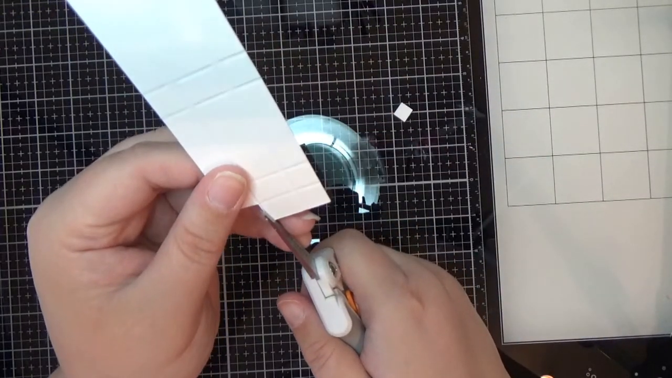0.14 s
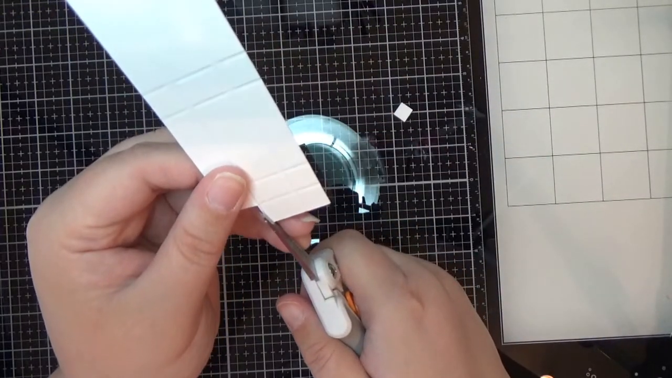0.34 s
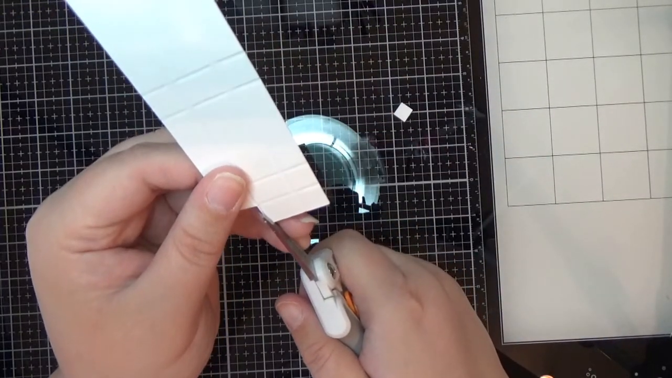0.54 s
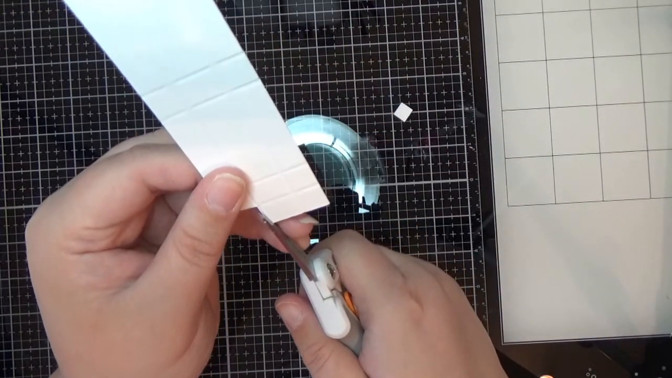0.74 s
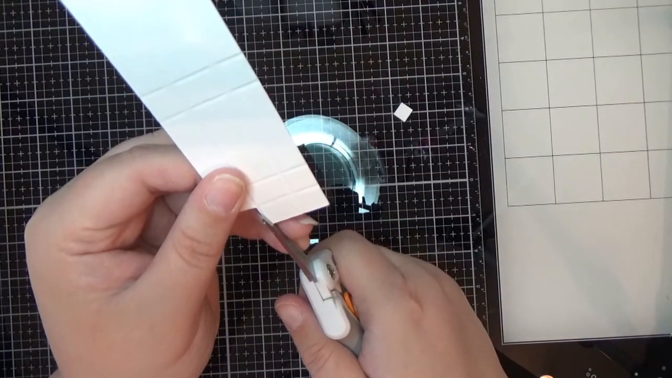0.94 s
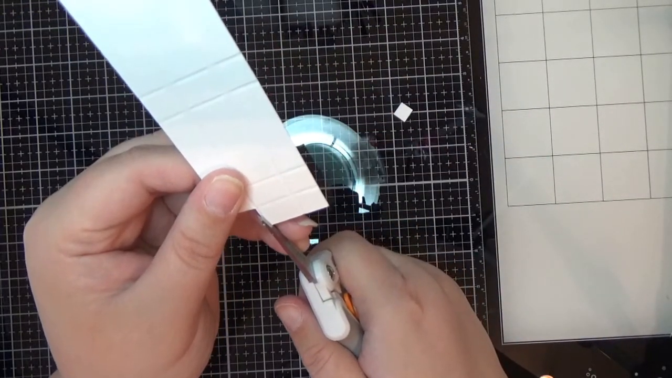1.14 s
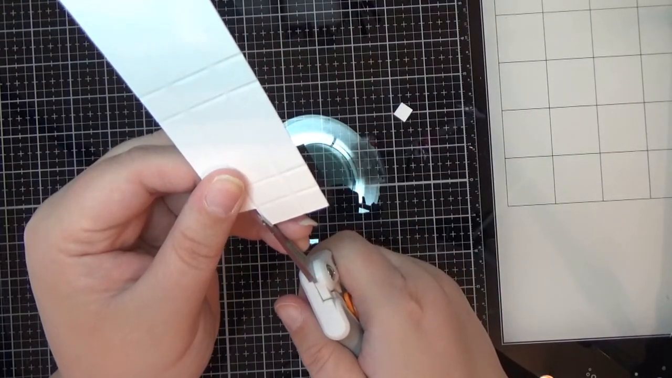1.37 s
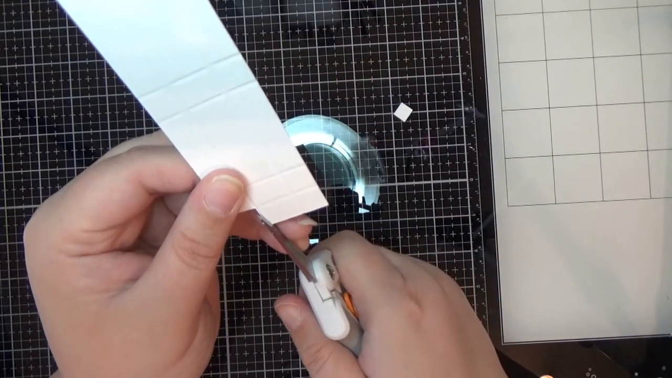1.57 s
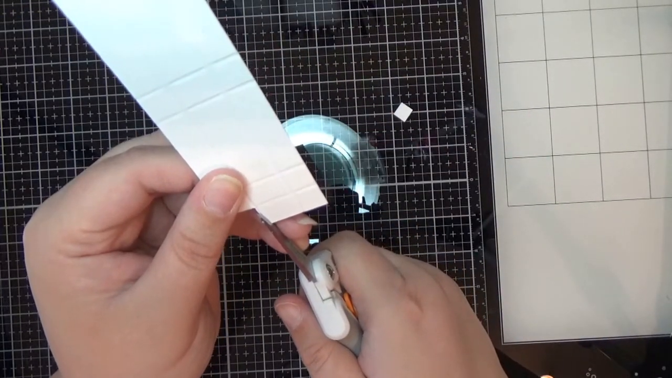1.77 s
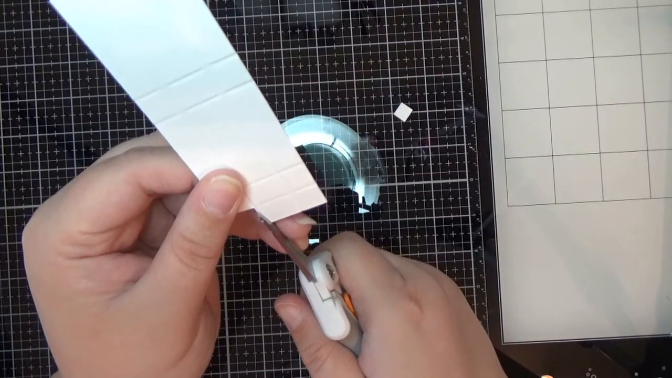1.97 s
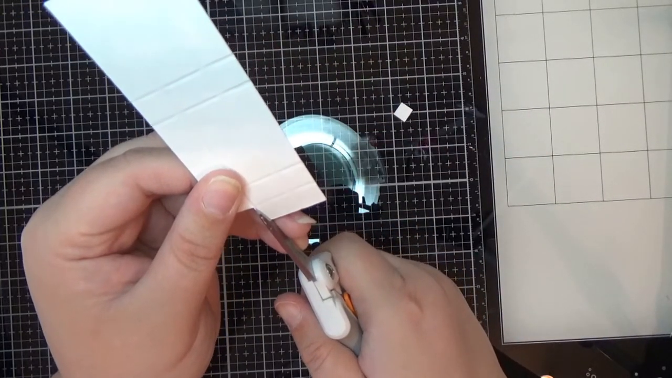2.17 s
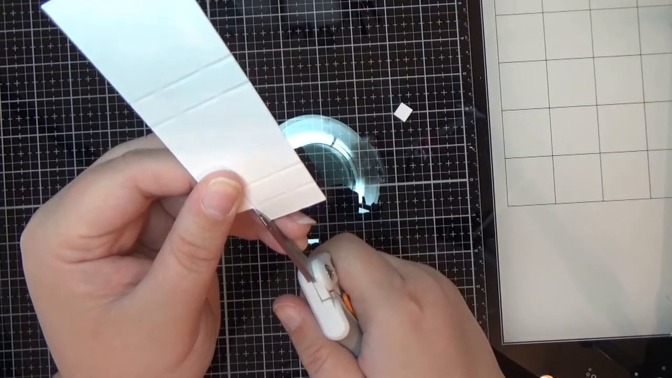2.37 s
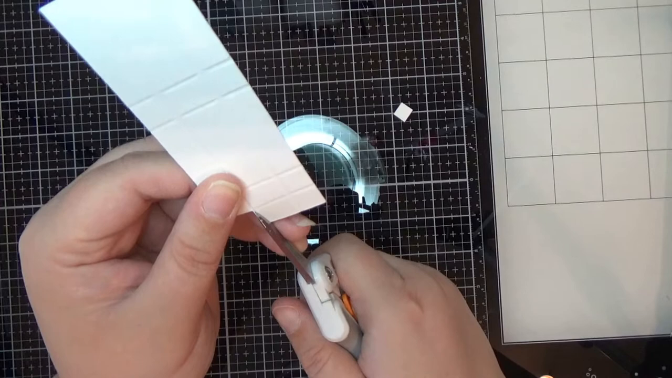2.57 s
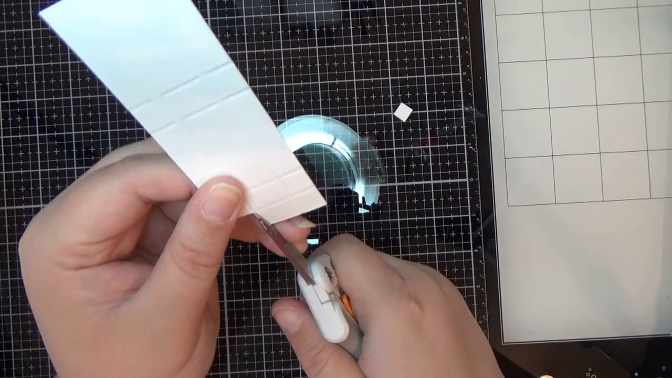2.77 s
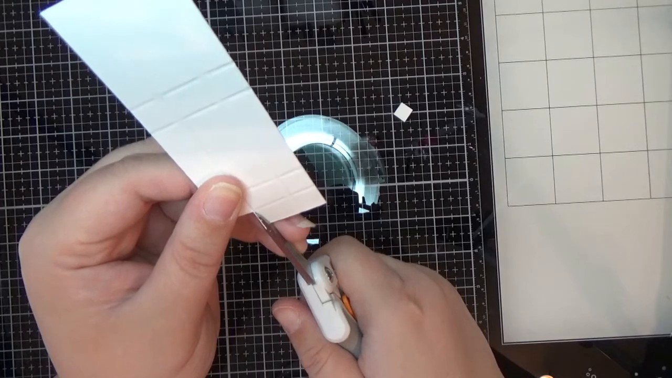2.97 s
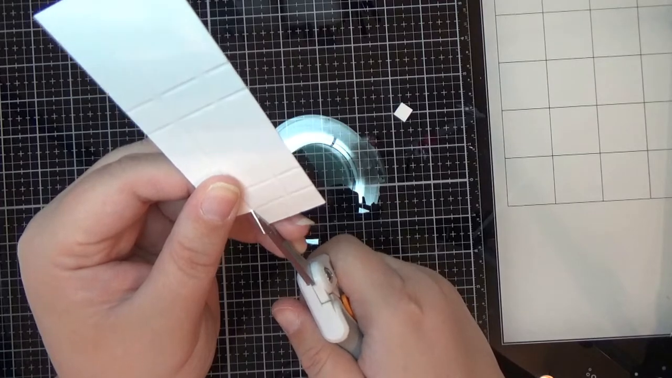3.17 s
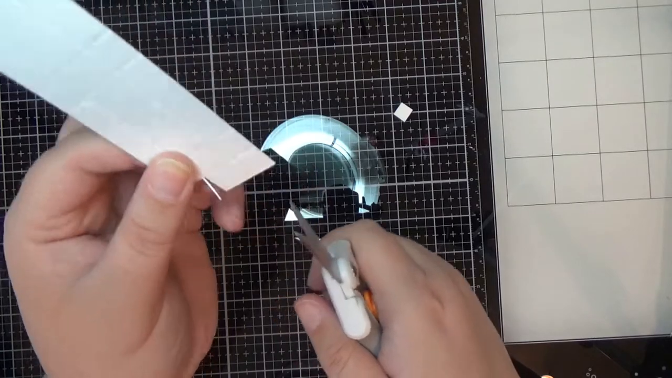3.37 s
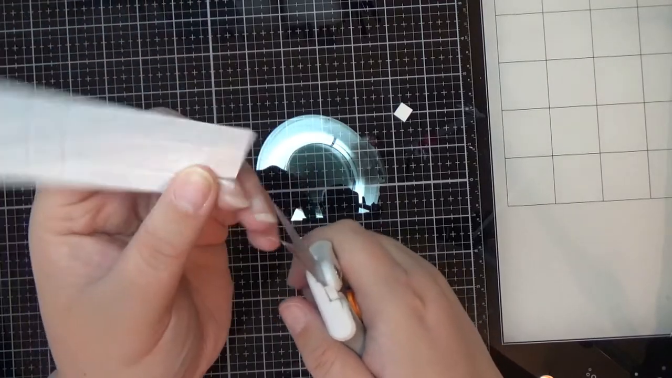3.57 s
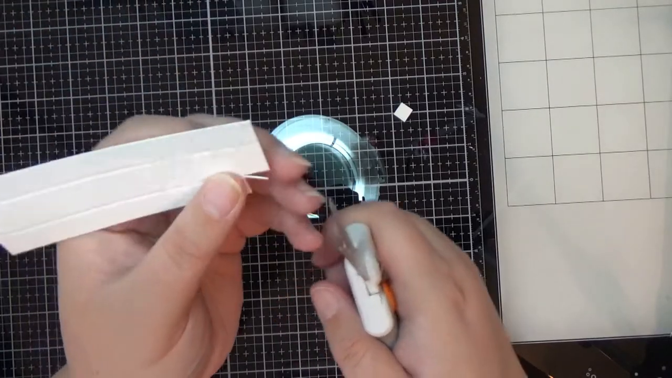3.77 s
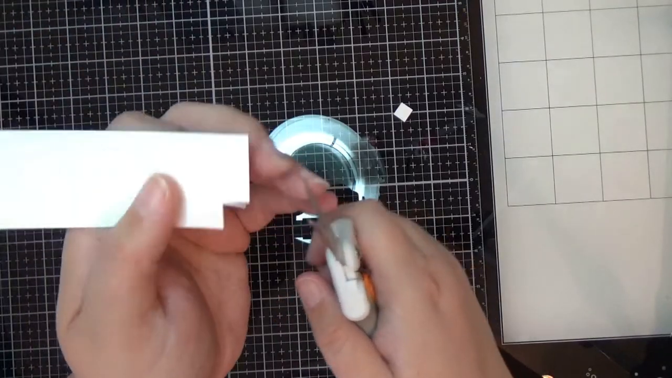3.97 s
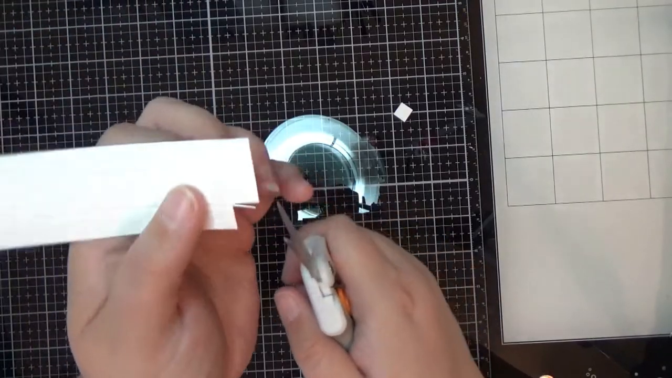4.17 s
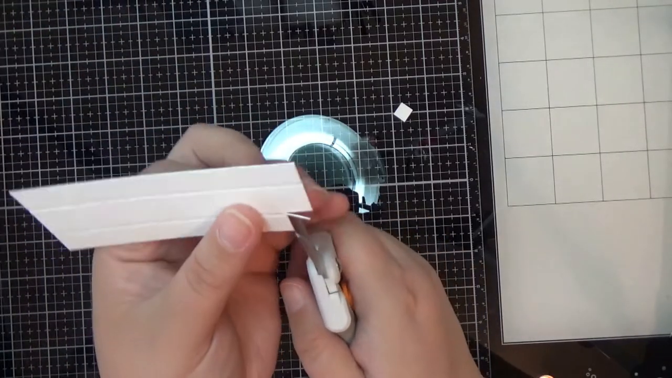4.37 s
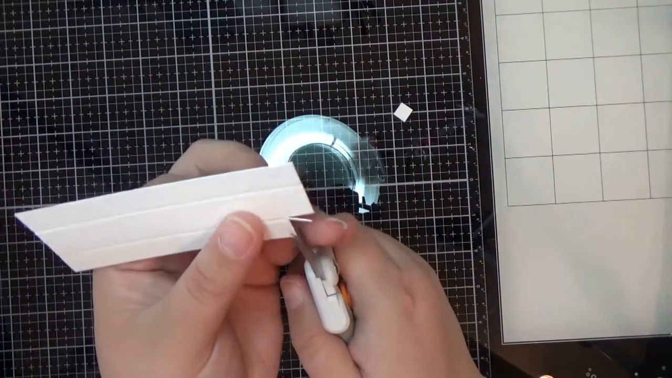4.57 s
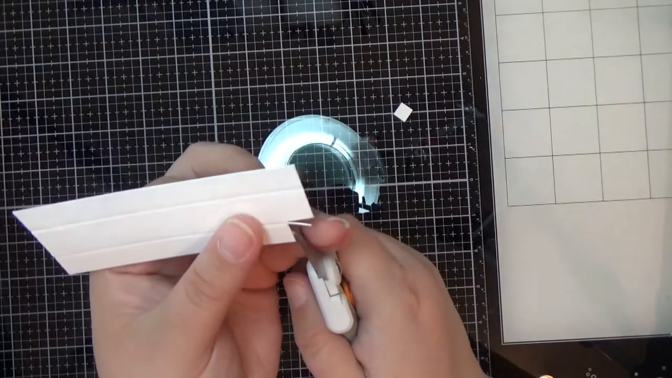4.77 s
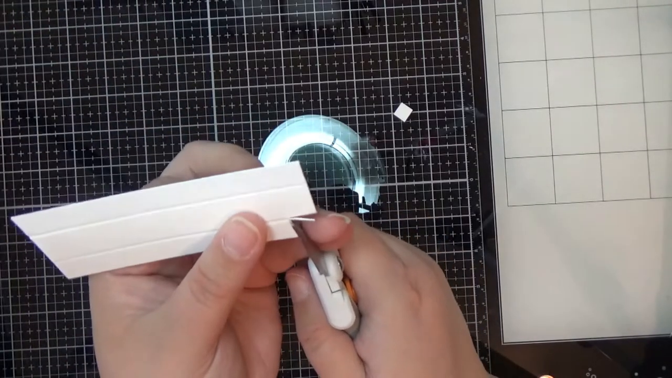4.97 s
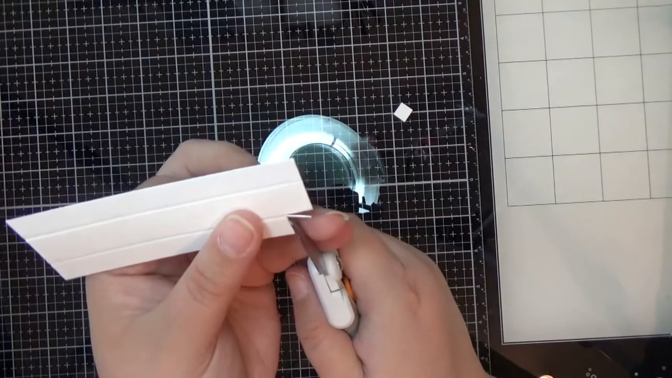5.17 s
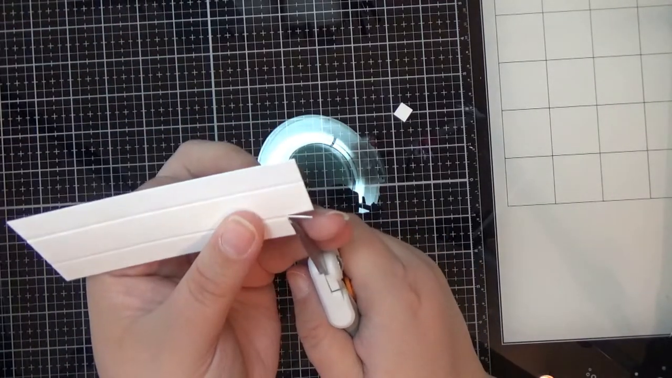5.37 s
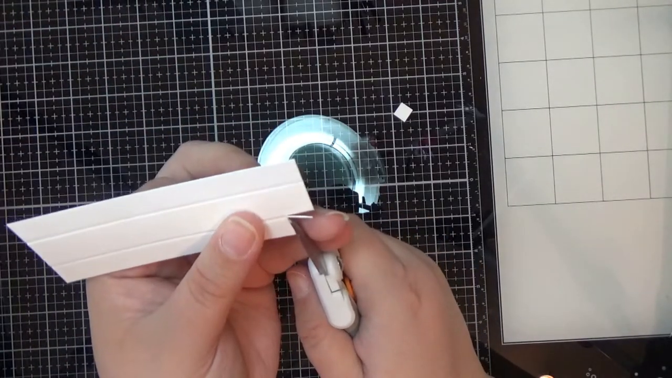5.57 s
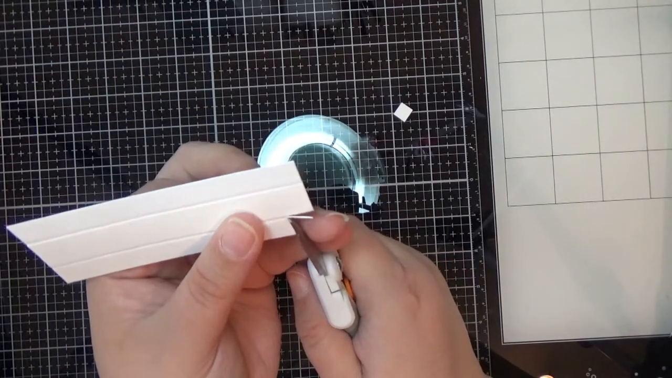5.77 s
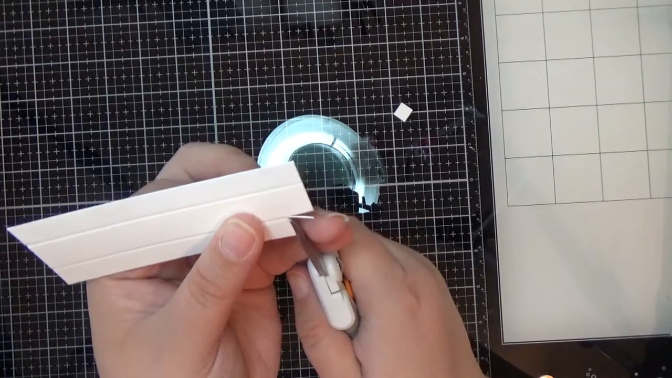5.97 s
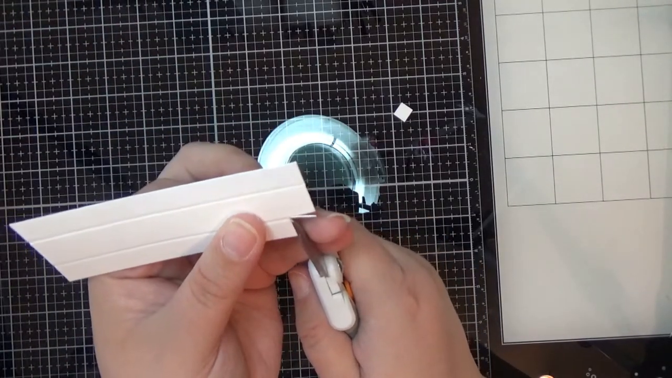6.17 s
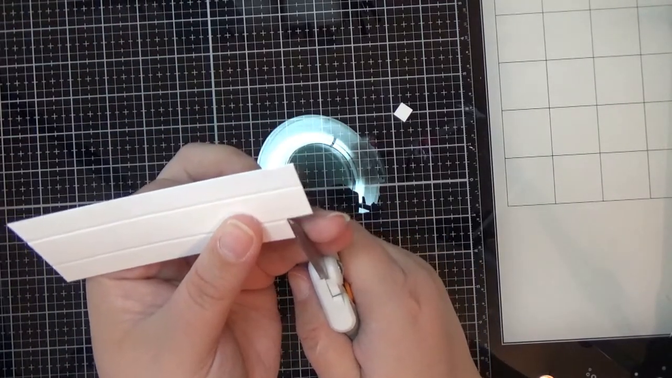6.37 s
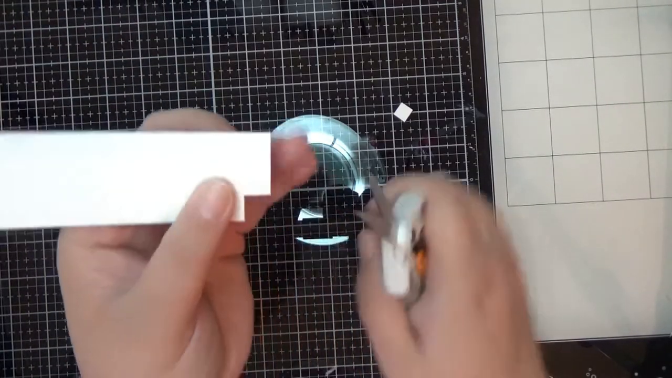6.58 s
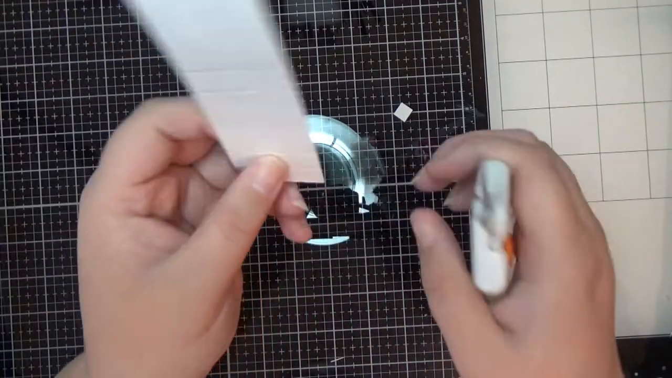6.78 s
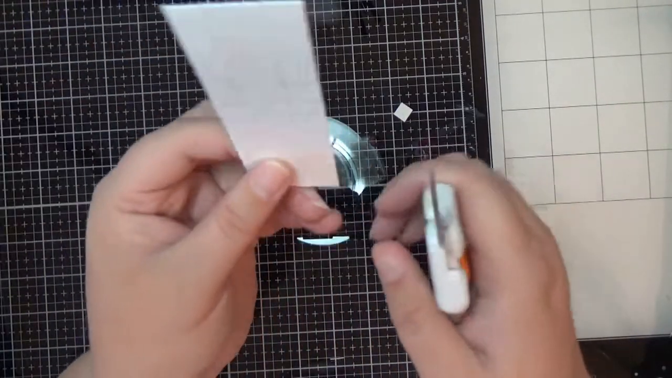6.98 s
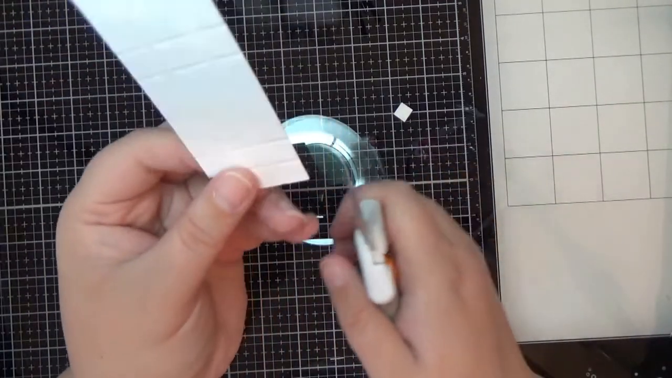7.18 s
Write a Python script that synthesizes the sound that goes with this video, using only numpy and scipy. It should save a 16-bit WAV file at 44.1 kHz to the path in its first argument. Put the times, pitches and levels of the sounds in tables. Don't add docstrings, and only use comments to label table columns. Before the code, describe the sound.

In a quiet small room, close microphones hear tiny dry clicks as blades settle on stiff card, then a sharp crunching snip. Fingers rub and turn the card with papery swishes and knocks. After a pause a second, louder snip cracks, and the card is lifted with soft rustling. A camera focus motor ticks faintly over steady hiss.

```python
import sys
import numpy as np
from scipy import signal
from scipy.fft import rfft, irfft, next_fast_len
from scipy.io import wavfile
from scipy.ndimage import uniform_filter1d

SR = 44100
rng = np.random.default_rng(int(sys.argv[2]) if len(sys.argv) > 2 else 0)


def generate_wav(signal):
    frames = np.transpose(np.atleast_2d(signal))
    scaled = np.clip(frames, -1, 1) * 32767
    pcm = np.round(scaled).astype(np.int16)
    wavfile.write(sys.argv[1], SR, pcm)


def boost_factor(decibels):
    exponent = np.asarray(decibels, float) / 20
    return 10 ** exponent


N = 318293
HZ = np.fft.rfftfreq(next_fast_len(N, real=True), 1 / SR)
PAD = 2 * (len(HZ) - 1)
TIME = np.arange(N) / SR
BODY_HZ, HISS_HZ = 1300, 4500
TOP_HZ = 11050


def shape(table):
    hz, db = np.transpose(table)
    return boost_factor(np.interp(np.log(HZ + 1), np.log(hz), db))


def colour(x, gain):
    y = irfft(rfft(x, PAD) * gain, PAD)[:N]
    return y / np.sqrt(np.mean(y ** 2))


def split(x, edges_hz):
    below = [1 / (1 + (HZ / hz) ** 8) for hz in edges_hz]
    uppers, lowers = [1] + below, below + [0]
    return np.array([colour(x, upper - lower) for upper, lower in zip(uppers, lowers)])


def walk(rate):
    hold = int(SR / rate)
    levels = np.repeat(rng.standard_normal(N // hold + 1), hold)
    return 0.53 * uniform_filter1d(uniform_filter1d(levels, hold), hold)[:N]


def fibres(spread_db):
    return rng.standard_normal(N) * boost_factor(spread_db * rng.exponential(size=N))


def bursts(events, bands, low_stretch):
    out = np.zeros(N)
    for (s, db, body_db, low_db, rise_ms, fall_ms), trio in zip(events, bands):
        i = int(s * SR)
        ms = 1000 * TIME[:min(N - i, SR // 4)]
        for band, rel_db, stretch in zip(trio, (0, body_db, low_db), (1, 1.25, low_stretch)):
            rise = max(rise_ms, 0.1) * stretch
            fall = max(fall_ms, 0.2) * stretch
            course = np.minimum(ms / rise, 1) ** 1.08 * np.exp(-np.maximum(ms - rise, 0) / fall)
            out[i:i + len(ms)] += boost_factor(db + rel_db - 5.5) * course * band[i:i + len(ms)]
    return out


def air():
    # frequency in Hz, hiss level in dB per Hz.
    floor = [(15, -60), (25, -29.5), (314, -4.5), (737, -6), (1010, -1.5), (1170, -4.5), (1600, -1.5),
             (1920, -8.5), (2070, -9.5), (2970, -9), (3470, -8.5), (4380, -15.5), (4860, -10),
             (10500, -15.5), (12000, -24), (15600, -71), (22000, -120)]
    # hum frequency in Hz, width in Hz, lift in dB.
    hums = [(1590, 20, 6.5), (2540, 91, 4.5), (820, 34, 5), (2063, 54, 9), (4720, 700, 4.5)]
    # frequency in Hz, side minus mid in dB.
    spread = [(60, -13), (110, -8), (190, -8), (350, -6), (620, 0), (1120, -4), (2000, -3), (3590, -2),
              (6450, -9), (11600, -7.5)]
    lift_db = sum(db / (1 + (2 * (HZ - hz) / width) ** 2) for hz, width, db in hums)
    mid, side = rfft(rng.standard_normal((2, PAD))) * shape(floor) * boost_factor(lift_db)
    side = side * shape(spread)
    level_db = -65 + 0.6 * walk(1.5)
    scale = boost_factor(level_db) / np.std(irfft(mid, PAD))
    return irfft(np.array([mid + side, mid - side]), PAD)[:, :N] * scale


def focus_motor():
    # start in seconds, end in seconds, strong step in dB, weak step in dB.
    spells = [
        (0, .03, -58, -58),
        (.07, 1.87, -53, -59),
        (1.91, 1.99, -60, -56),
        (3.78, 5.83, -51, -60),
        (5.9, 7.2, -52, -59),
    ]
    # ring in Hz, level in dB, t60 in seconds.
    barrel = [(3487, 6.5, .012), (4073, -10.5, 0.054), (2766, -10.5, 0.041), (2570, -7, 0.019)]
    steps, running = np.zeros(N), np.zeros(N)
    clock = np.arange(0.0093, N / SR, 0.04)
    chance = rng.standard_normal(len(clock))
    for first, last, strong_db, weak_db in spells:
        db = np.where(np.arange(len(clock)) % 2, strong_db, weak_db) + 0.54 * chance
        on = (clock > first) & (clock < last)
        steps[(clock[on] * SR).astype(int)] = boost_factor(db[on])
        running[int(first * SR):int(last * SR) + 2000] = 1
    t = TIME[:2000]
    ring = sum(boost_factor(db - 60 * t / t60) * np.sin(2 * np.pi * hz * t) for hz, db, t60 in barrel)
    ticks = signal.fftconvolve(steps, ring * np.minimum(t / 0.00085, 1))[:N]
    whir_shape = shape([(900, -24), (2300, -2.5), (5000, -11.5), (10000, -9.0), (12000, -23)])
    whir = colour(rng.standard_normal(N), whir_shape)
    return ticks + boost_factor(-79.5) * uniform_filter1d(running, size=2000) * whir


def room(x):
    # band centre in Hz, t60 in seconds, level in dB.
    bands = [(315, 0.21, -6.5), (1190, 0.2, -19.5), (2450, 0.3, -23.5), (4420, 0.29, -26.5),
             (6470, 0.27, -24), (9800, 0.15, -26)]
    t = TIME[:SR // 2]
    tail = 0
    for hz, t60, db in bands:
        edges_hz = [hz / 1.166, min(hz * 1.295, TOP_HZ)]
        sos = signal.butter(2, edges_hz, "bandpass", fs=SR, output="sos")
        mid, side = signal.sosfilt(sos, rng.standard_normal((2, len(t))))
        stereo = mid + 0.7 * side * np.array([[1], [-1]])
        tail = tail + boost_factor(db - 14.5 - 60 * t / t60) * stereo
    onset = np.clip((t - 0.003) / 0.0012, 0, 1)
    return signal.fftconvolve(x[None], tail * onset, axes=1)[:, :N]


def thumps():
    # start in seconds, pitch in Hz, level in dB, t60 in seconds.
    bends = [
        (3.02, 422, -51.5, 0.11),
        (4.132, 360, -50, 0.11),
        (6.268, 192, -55.5, 0.15),
        (6.269, 407, -47, 0.053),
    ]
    blade_ping = (0.571, 3070, -54, 0.04)
    out, t = np.zeros(N), TIME[:8000]
    for s, hz, db, t60 in [*bends, blade_ping]:
        ring = boost_factor(db - 60 * t / t60) * np.sin(2 * np.pi * hz * t)
        out[int(s * SR):][:len(t)] += ring * np.minimum(t / 0.0018, 1)
    return out


def swell(s, swell_ms, fade_ms):
    out, near = np.zeros(N), slice(int((s - 0.4) * SR), int((s + 0.4) * SR))
    ms = 1000 * (TIME[near] - s)
    progress = np.where(ms < 0, -ms / swell_ms, ms / fade_ms)
    out[near] = boost_factor(-11 * progress ** 1.36)
    return out


def strokes():
    # peak in seconds, level in dB, pitch of the rub in Hz,
    # swell in ms, fade in ms.
    rubs = [(3.34, -62.5, 7500, 40, 20), (3.53, -61, 5000, 19, 33), (3.61, -57.5, 8500, 32, 53),
            (3.63, -61.5, 3330, 70, 83), (3.665, -62, 9000, 70, 48), (3.83, -63, 8500, 310, 60),
            (3.81, -65, 4000, 100, 80), (3.91, -49.5, 8900, 41, 114), (3.974, -49, 3730, 85, 110),
            (4.13, -53.5, 8000, 77, 60), (4.18, -51.5, 3700, 80, 93), (4.22, -44, 7360, 68, 69),
            (4.23, -63, 1940, 190, 360), (6.58, -58.5, 7600, 71, 240), (6.8, -50, 7500, 76, 62),
            (6.76, -58.5, 1540, 280, 250), (6.69, -70, 3500, 49, 80), (6.99, -53.5, 8300, 100, 82),
            (7.016, -58.5, 2800, 50, 74), (7.17, -55.5, 8800, 59, 45), (7.176, -65.5, 3500, 100, 54)]
    centres_hz = np.array([9000, 5700, 3500, 1800])
    power = 0
    for s, db, hz, swell_ms, fade_ms in rubs:
        band_db = db - 17.5 * np.abs(np.log2(np.array(centres_hz) / hz))
        power = power + np.outer(boost_factor(band_db), swell(s, swell_ms, fade_ms)) ** 2
    return np.sqrt(power)


def whistles():
    # peak in seconds, level in dB, pitch in Hz, swell in ms, fade in ms.
    slides = [
        (4.06, -57, 3700, 110, 110),
        (4.24, -58.5, 5900, 90, 65),
        (6.8, -65.5, 5400, 60, 60),
    ]
    rub, width_hz = fibres(1.9), 350
    out = np.zeros(N)
    for s, db, hz, swell_ms, fade_ms in slides:
        band = colour(rub, 1 / (1 + (2 * (HZ - hz) / width_hz) ** 2))
        out += boost_factor(db) * swell(s, swell_ms, fade_ms) * band
    return out


def card():
    # frequency in Hz, level in dB per Hz.
    paper = [(260, -27.5), (450, -14.5), (588, -8.5), (728, -9), (1070, -10.5), (1370, -4.5), (1540, -2),
             (2210, -2), (2530, -3), (3210, -4.5), (5200, -8.5), (5640, -3.5), (6890, -14.5), (9000, -7),
             (11000, -14.5), (14300, -43), (22000, -120)]
    # start in seconds, peak in dB, ring in dB, ring in Hz, fall in ms.
    cracks = [(2.0143, -35, -4.5, 2530, 3.1), (2.0357, -50.5, 8.5, 3370, 1.7),
              (2.0655, -47.5, -7, 2660, 5.1), (2.1418, -34.5, -4.5, 2680, 2.2),
              (2.2953, -49.5, -20, 1800, 3.6), (3.2123, -47, -7, 3090, 1.9), (3.5358, -48.5, 6.5, 3380, 3),
              (3.756, -48, -5, 3320, 2.8), (4.3945, -50.5, 11, 4800, 1.9), (4.405, -51, 2, 4740, 2.3),
              (4.666, -29, -9.5, 3590, 2.3), (6.668, -42, -14, 2590, 6.8)]
    knocks = [
        (1.8103, -55, 1, 3490, 3.57),
        (2.2333, -41, -5.5, 2730, 2.6),
        (3.221, -49.5, 7, 2730, 4),
        (3.5476, -48, 2.5, 2690, 2.2),
        (3.5554, -55, 5, 3200, 1.9),
        (3.6278, -41, -2, 3360, 2.1),
        (3.641, -40, 2, 3470, 1.9),
        (4.134, -44, 7, 6150, 2.7),
        (6.6034, -34, 5, 2500, 1.3),
    ]
    # start in seconds, peak in dB,
    # body in dB, rise in ms, fall in ms.
    slips = [(1.999, -46, -21, 8.6, 1.5), (2.083, -51.5, -21, 10, 3), (2.1324, -33.5, -19, 5.9, 1.6),
             (2.148, -65, -19, 4, 33), (3.183, -43, -4.5, 30, 15.6), (3.279, -47, -24, 15, 8.9),
             (3.403, -50, -13.5, 23, 37), (3.442, -51, -8, 15, 11), (3.712, -39, -5, 22.3, 2),
             (4.124, -44, -4, 16.5, 4.5), (6.423, -45.5, -2, 21, 25)]
    hiss, body, low = bands = split(colour(fibres(1.6), shape(paper)), (HISS_HZ, BODY_HZ))
    waver = 1.15 * colour(rng.standard_normal(N), 1 / (1 + (HZ / 350) ** 2))
    out = whistles()
    for rows, low_db in (cracks, -20), (knocks, -10):
        events, patches = [], []
        for s, db, ring_db, hz, fall in rows:
            ring = 1.48 * np.sin(2 * np.pi * hz * TIME + waver)
            events.append((s, db, ring_db, low_db, 1.4, fall))
            patches.append((hiss, ring + 0.47 * body, low))
        out = out + bursts(events, patches, 2.4)

    events = [(s, db, body_db, body_db - 5.5, rise, fall) for s, db, body_db, rise, fall in slips]
    out = out + bursts(events, [bands * boost_factor(0.83 * walk(150))] * len(slips), 1.18)

    rub = split(colour(fibres(0.73), shape(paper)), (6900, HISS_HZ, 2500, BODY_HZ))
    flicker_db = np.outer([4.5, 4, 5.3, 1.1, 2.2], walk(90))
    sheen, hiss, flex, body, low = rub * boost_factor(flicker_db)
    for band, gain in zip((sheen, hiss, flex, body + boost_factor(-1.5) * low), strokes()):
        out = out + band * gain * boost_factor(2.8 * walk(25))
    return out


def push(turns):
    return (2 * turns * np.exp(1 - 2 * turns)) ** 2


def scissors():
    # frequency in Hz, level in dB per Hz.
    blades = [(600, -13.5), (1200, -3), (2200, -1), (3300, -3.5), (4300, -2), (5500, -0.5), (6800, -5),
              (8500, -4.5), (11000, -7.5), (14000, -5)]
    # start in seconds, peak in dB, body in dB, rise in ms,
    # fall in ms.
    tears = [
        (2.9888, -31.5, -20, 5.3, 3.5),
        (2.994, -29, 0, 5, 0.75),
        (3.0145, -24, -6, 2.3, 3.7),
        (3.0162, -25, -7.5, 2.2, 1.5),
        (6.243, -48, -14, 1.7, 2.2),
        (6.262, -34, -2, 12.6, 3.6),
        (6.2667, -12, -6, 2.36, 1.6),
    ]
    # start in seconds, level in dB, damping factor.
    clacks = [
        (3.0198, -17, 1.25),
        (6.2695, -16, 1.4),
    ]
    # resonance in Hz, width in Hz, level in dB.
    resonances = [
        [(600, 220, -17), (1040, 200, -20), (1670, 200, -7), (2250, 250, -8), (2710, 300, 0), (4950, 300, -14), (5470, 250, -15), (6140, 300, -5), (7640, 300, -14), (8950, 300, -12)],
        [(520, 200, -21), (700, 260, -16), (1670, 200, -13), (2350, 300, -4), (2880, 350, 2), (3620, 300, -9), (4930, 280, -1), (5490, 280, -8), (6050, 280, -5), (6890, 250, -9), (7690, 250, -9), (8070, 250, -9)],
    ]
    bands = split(colour(fibres(1.0), shape(blades)), (HISS_HZ, BODY_HZ))
    events = []
    for s, db, body_db, rise, fall in tears:
        thud_db = -18.5 - max(db + 28.5, 0)
        events.append((s, db, body_db, thud_db, rise, fall))
    tear = bursts(events, [bands] * len(tears), 1.05)

    clack, t = np.zeros(N), TIME[:4000]
    for (s, db, damping), peaks in zip(clacks, resonances):
        ring = 0
        for k, (hz, width, top_db) in enumerate(peaks):
            gain = (-1) ** k * boost_factor(top_db) * width / 300
            ring = ring + gain * push(damping * width * t) * np.sin(2 * np.pi * hz * t)
        clack[int(s * SR):][:len(t)] += boost_factor(db) * ring
    return tear, clack


def scene():
    thin = signal.butter(2, 220, "highpass", fs=SR, output="sos")
    tear, clack, paper = signal.sosfilt(thin, [*scissors(), card()])
    near = tear + clack + thumps() + focus_motor() + paper * boost_factor([[0.35], [-0.35]])
    treble = signal.butter(2, 6000, "highpass", fs=SR, output="sos")
    glint = signal.sosfilt(treble, tear + clack)
    near = near + boost_factor(-12) * glint * np.array([[-1], [1]])
    walls = room(boost_factor(0.5) * tear + 0.17 * clack + paper)
    return (near + walls + air()) * boost_factor([[0.2], [-0.2]])


def band_limit(x):
    return signal.sosfilt(signal.butter(12, 12170, fs=SR, output="sos"), x)


def record(dry):
    steep = signal.ellip(8, 0.3, 40, TOP_HZ, fs=SR, output="sos")
    return band_limit(signal.sosfilt(steep, dry))


dry = scene()
out = record(dry)
generate_wav(out)
```